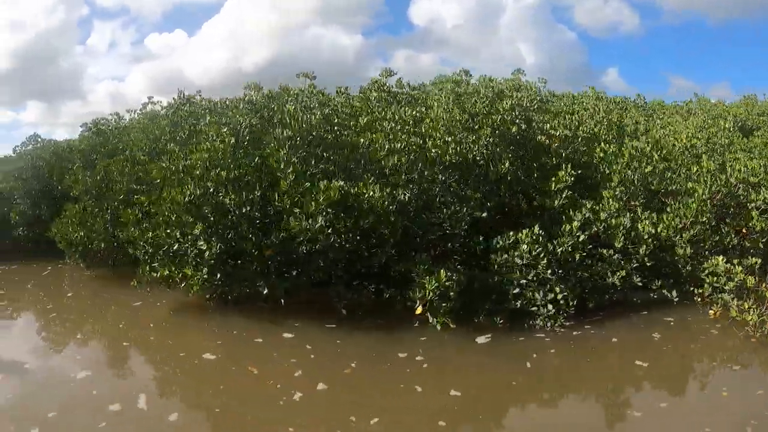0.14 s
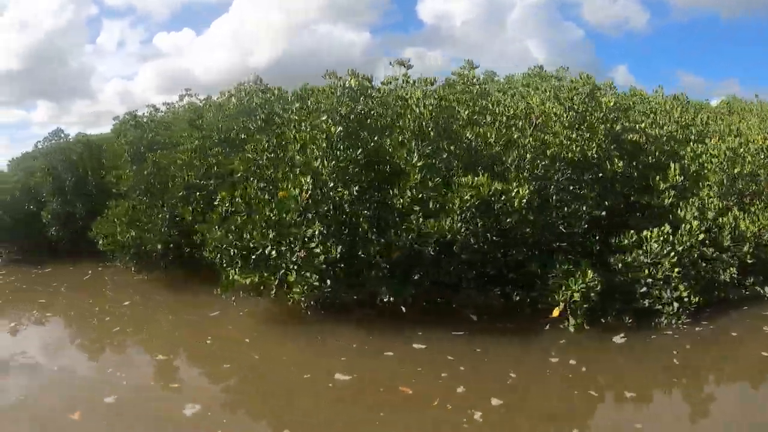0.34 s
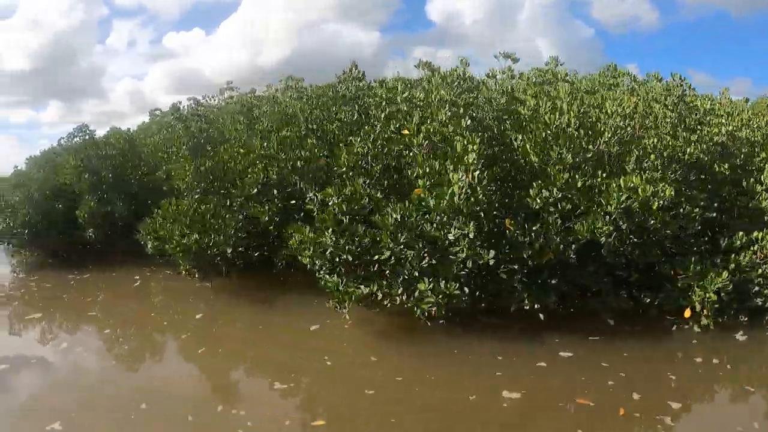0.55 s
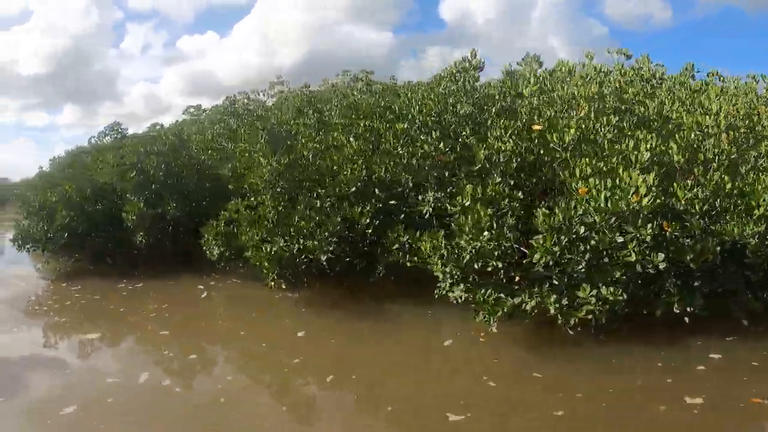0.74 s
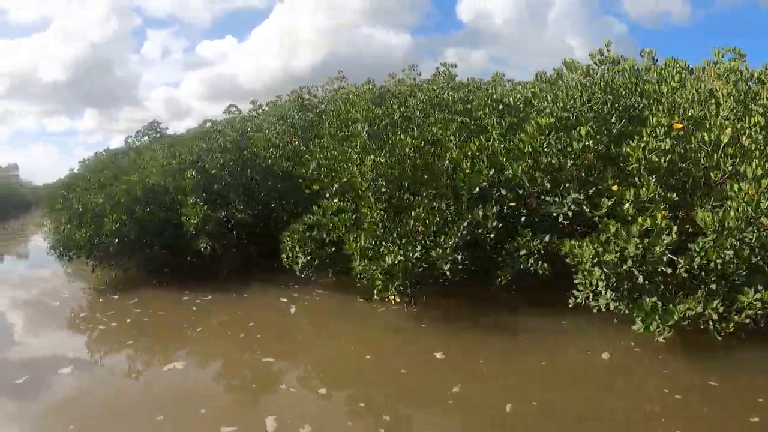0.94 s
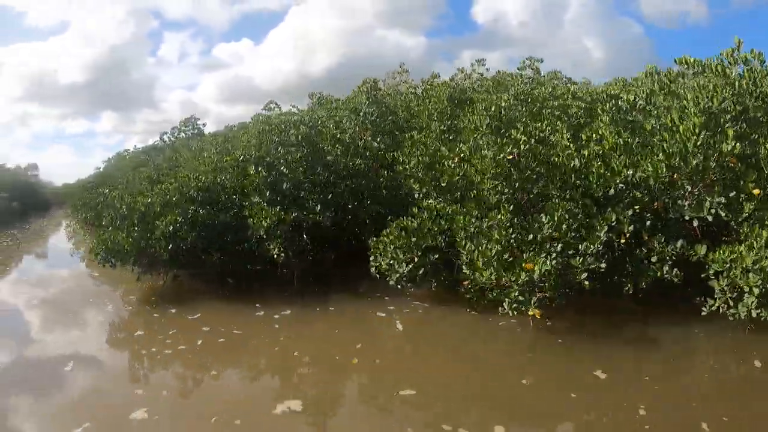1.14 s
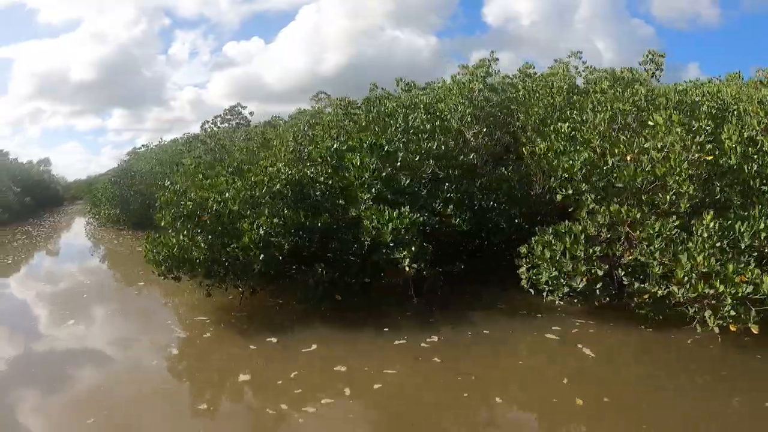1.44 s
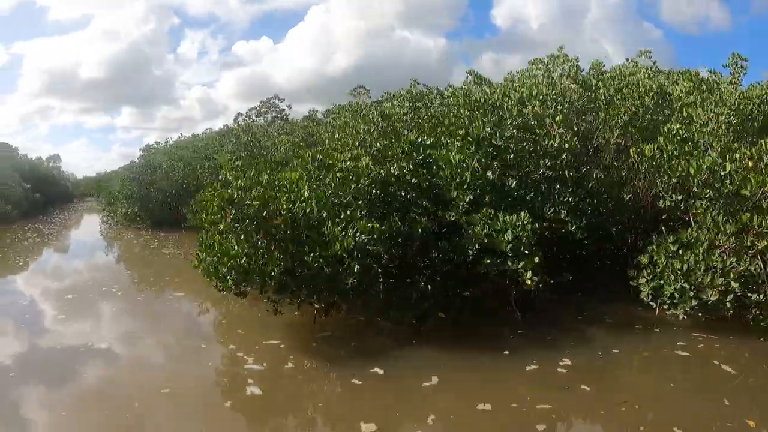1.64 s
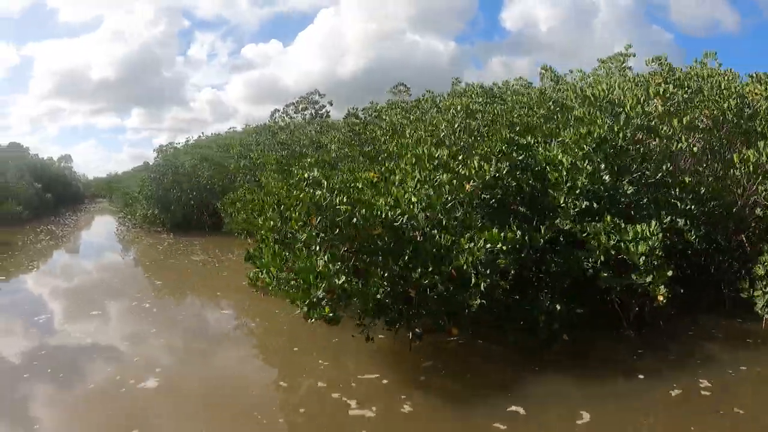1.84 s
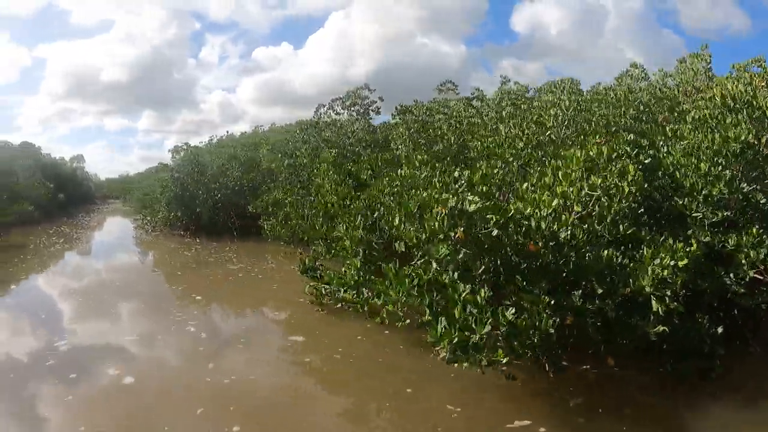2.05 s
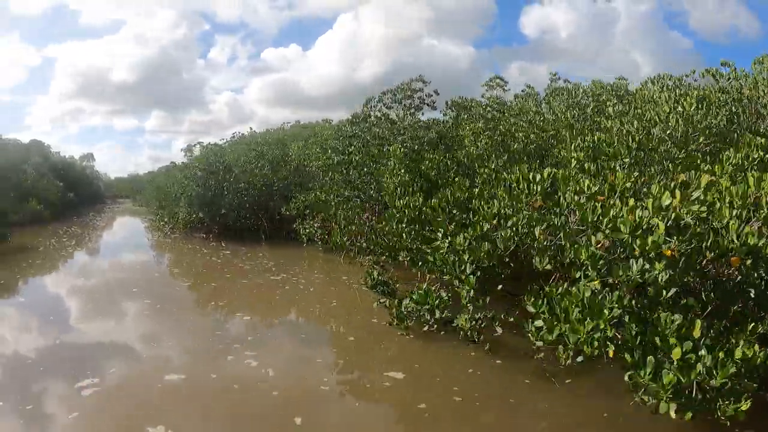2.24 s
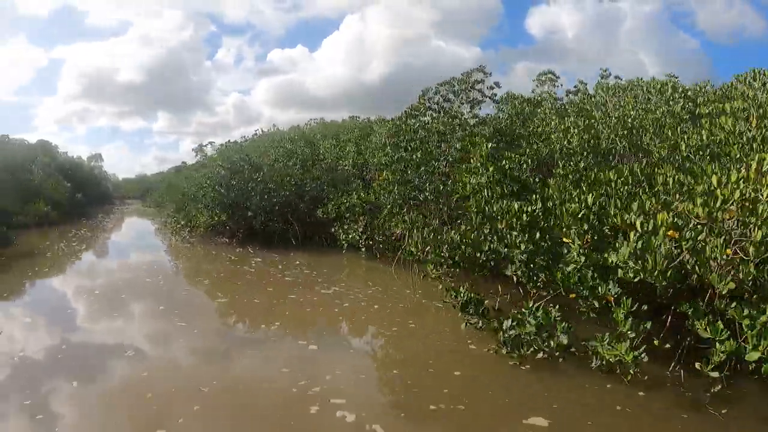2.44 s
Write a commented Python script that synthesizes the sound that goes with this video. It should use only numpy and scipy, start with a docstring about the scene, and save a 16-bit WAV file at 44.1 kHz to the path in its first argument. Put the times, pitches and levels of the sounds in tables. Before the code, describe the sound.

An outboard motor drones at a steady cruising speed, low and buzzy with a rough rasp, while wake rushes and fizzes along the hull, swelling midway; light wind rumbles the on-board microphone on an open river.

```python
"""An outboard motor drones at a near-steady speed, heard on board by a listener slowly turning to the bow.
Phase-locked harmonics of the engine cycle make the firing note and buzz; gated noise makes the rasp.
The wake rushes and fizzes along the hull, swelling midway: flickering noise, ringing bubbles, fine spray.
A hollow wash comes up midway, over a lumpy low rumble of wind made of noise with short buffets."""
import sys
import numpy as np
from scipy import signal
from scipy.fft import rfft, irfft, next_fast_len
from scipy.io import wavfile

SR = 44100
rng = np.random.default_rng(int(sys.argv[2]) if len(sys.argv) > 2 else 0)


def digitize_waveform(pressure):
    """Quantize a signal to 16-bit integers and store it at the path in sys.argv[1].

    Rows of a 2-D input are taken as channels; values are limited to [-1, 1].
    """
    field = np.atleast_2d(pressure).T
    bounded = np.clip(field, -1, 1)
    quanta = np.round(bounded * 32767).astype(np.int16)
    wavfile.write(sys.argv[1], SR, quanta)


N = 114660


def from_db(db):
    """Decibels to amplitude gain."""
    return 10 ** (np.asarray(db) / 20)


def rms_one(x):
    """Scale to unit rms."""
    return x / np.sqrt(np.mean(x ** 2) + 1e-20)


def in_time(rows):
    """Interpolate (seconds, value) rows to every sample."""
    seconds, values = np.transpose(rows)
    return np.interp(np.arange(N) / SR, seconds, values)


def drift(corner_hz):
    """Random wandering, rms 1: white noise through two equal low-pass poles."""
    step = 40  # samples per control point
    pole = np.exp(-2 * np.pi * corner_hz * step / SR)
    noise = rng.standard_normal(N // step + 2002)
    slow = signal.lfilter([1], [1, -2 * pole, pole * pole], noise)[2000:]  # drop the settling
    slow = rms_one(slow - slow.mean())
    return np.interp(np.arange(N) / step, np.arange(len(slow)), slow)


def banded_noise(spectrum, patchy_db, flicker_hz):
    """Noise of a smooth spectrum whose overlapping half-octave bands flicker independently; rms 1."""
    hz, db = np.transpose(spectrum)
    size = next_fast_len(N)
    octave = np.log2(np.maximum(np.arange(size // 2 + 1) * SR / size, 1))
    inside = np.clip(octave, np.log2(hz[0]), np.log2(hz[-1]))
    outside_db = 30 * np.abs(octave - inside)  # 30 dB per octave beyond the table
    shape = from_db(np.interp(octave, np.log2(hz), db) - outside_db)
    coloured = rfft(rng.standard_normal(size)) * shape
    out = 0
    for centre in np.arange(4, 14.6, .5):  # log2 of Hz
        if hz[0] / 2 < 2 ** centre < hz[-1] * 2:
            share = np.maximum(1 - 2 * np.abs(octave - centre), 0)
            band = irfft(coloured * share, size)[:N]
            out = out + band * from_db(patchy_db * drift(flicker_hz))
    return rms_one(out)


# Wind rumble spectrum. Each row: frequency in Hz, relative density in dB per Hz.
WIND_SPECTRUM = [(15, 0.5), (25, -2.5), (40, -2), (62, -3), (95, -2), (140, -6), (220, -10.5), (500, -30),
                 (1500, -66)]
# Wind level before buffets. Each row: time in seconds, level in dB.
WIND_LEVEL_DB = [(0, -22), (.42, -23.5), (.8, -24.5), (1.35, -25.5), (1.8, -23.5), (2.2, -27.5), (2.6, -28)]
# Buffets of wind. Each row: centre in seconds, extra level in dB.
WIND_BUFFETS = [(.28, 2.5), (.44, 7), (1.33, 3), (1.599, 1), (2.21, 5.5)]
BUFFET_SIGMA_S = 0.032


def wind():
    """Low noise of the boat's own headwind, lifted by Gaussian buffets."""
    t = np.arange(N) / SR
    buffets_db = sum(db * np.exp(-.5 * ((t - s) / BUFFET_SIGMA_S) ** 2) for s, db in WIND_BUFFETS)
    rumble = banded_noise(WIND_SPECTRUM, patchy_db=0.5, flicker_hz=6)
    return from_db(in_time(WIND_LEVEL_DB) + buffets_db) * rumble


# Hollow band of hull noise. Each row: frequency in Hz, relative density in dB per Hz.
HOLLOW_SPECTRUM = [(480, -11), (550, -6), (585, -1.5), (640, -8), (720, -14.5)]
# Hollow band level. Each row: time in seconds, level in dB.
HOLLOW_LEVEL_DB = [(0, -49.5), (.7, -44.5), (1.05, -36), (1.45, -38), (1.8, -38.5), (2.6, -41)]


def hull():
    """Hollow wash: a narrow hump of noise that comes up midway."""
    return from_db(in_time(HOLLOW_LEVEL_DB)) * banded_noise(HOLLOW_SPECTRUM, patchy_db=1.0, flicker_hz=10)


BUBBLES_PER_S, BUBBLE_SPREAD_DB = 3600, 5
BUBBLE_CYCLES = 5  # cycles to decay 60 dB


def bubbles():
    """Dense tiny bubbles: random clicks strike 18 damped resonators; rms 1."""
    pitches_hz = np.geomspace(900, 5000, num=18)
    sizes = from_db(BUBBLE_SPREAD_DB * np.minimum(rng.exponential(1, N), 5))
    sizes = sizes * rng.choice([-1, 1], N)
    clicks = sizes * (rng.random(N) < BUBBLES_PER_S / SR)
    dealt = rng.integers(0, len(pitches_hz), N)
    out = 0
    for k, hz in enumerate(pitches_hz):
        r = np.exp(-np.log(1000) * hz / (BUBBLE_CYCLES * SR))
        w = 2 * np.pi * hz / SR
        struck = clicks * (dealt == k) + 1e-18
        out = out + signal.lfilter([0, np.sin(w)], [1, -2 * r * np.cos(w), r * r], struck)
    return rms_one(signal.sosfilt(signal.butter(2, 7000, fs=SR, output="sos"), out))


# Finest spray. Each row: frequency in Hz, relative density in dB per Hz.
SPRAY_SPECTRUM = [(8000, -11.5), (10000, -0.5), (12500, 0.5), (14500, -3), (16000, -10)]
# Spray level. Each row: time in seconds, level in dB.
SPRAY_LEVEL_DB = [(0, -91.5), (1.6, -84.5), (2.05, -76.5), (2.35, -66.5), (2.6, -66)]


def spray():
    """Trace of fine spray: faint high noise that grows late."""
    return from_db(in_time(SPRAY_LEVEL_DB)) * banded_noise(SPRAY_SPECTRUM, patchy_db=1.0, flicker_hz=25)


# Rush of the wake. Each row: frequency in Hz, relative density in dB per Hz.
WAKE_SPECTRUM = [(400, 2.5), (1000, 1.5), (1700, -2), (2600, -1.5), (4000, -2.5), (5000, -6), (6300, -11.5),
                 (8000, -15), (9500, -24), (11000, -34.5), (12300, -36), (15000, -52)]
# Level of the rush, before brightening. Each row: time in seconds, level in dB.
WAKE_LEVEL_DB = [(0, -41), (.35, -39.5), (.7, -38), (1.05, -37.5), (1.8, -37.5), (2.2, -39), (2.6, -40)]
BUBBLES_RE_RUSH_DB = -8
BRIGHTENING_DB_PER_DB = 0.45  # treble gain per dB of swell


def wake():
    """Rushing water plus bubbles, its treble rising faster than its level as it swells."""
    level_db = in_time(WAKE_LEVEL_DB)
    rush = banded_noise(WAKE_SPECTRUM, patchy_db=0.72, flicker_hz=9.3)
    water = rush + from_db(BUBBLES_RE_RUSH_DB) * bubbles()
    treble = signal.sosfilt(signal.butter(1, 3000, "high", fs=SR, output="sos"), water)
    treble_gain = from_db(BRIGHTENING_DB_PER_DB * (level_db - level_db.mean()))
    return from_db(level_db) * (water + treble * (treble_gain - 1))


# Mechanical rasp and hull rattle. Each row: frequency in Hz, relative density in dB per Hz.
RASP_SPECTRUM = [(130, -5.5), (200, -0.5), (280, -4.5), (390, -4.5), (480, -14.5), (600, -12.5),
                 (780, -18.5), (1000, -15.5), (1400, -25), (2000, -27.5), (4000, -39), (9000, -55)]
RASP_DB = -27.5  # before the swell
FIRING_DEPTH, LOPE_DEPTH = 0.12, 0.09


def rasp(angle, swell_db):
    """Engine and hull noise that pulses with each of three firings and lopes once a cycle."""
    gate = 1 + FIRING_DEPTH * np.cos(3 * angle) + LOPE_DEPTH * np.cos(angle)
    noise = banded_noise(RASP_SPECTRUM, patchy_db=1.2, flicker_hz=16)
    return from_db(RASP_DB + swell_db) * rms_one(gate * noise)


# Harmonics 2, 3 (firing), 4 and 6, changing as the listener turns, before flutter.
# Each row: time in seconds, rms level in dB.
SECOND_DB = [(0, -33.5), (.8, -27), (1.3, -31.5), (1.95, -36), (2.15, -45), (2.6, -45)]
FIRING_DB = [(0, -16), (.45, -18), (1.2, -15.5), (1.48, -17.3), (1.75, -15), (2.0, -16.5), (2.6, -16)]
FOURTH_DB = [(0, -25.5), (.4, -21), (.75, -21), (1.3, -26), (1.95, -25), (2.6, -25)]
SIXTH_DB = [(0, -32.5), (.5, -37), (.95, -41.5), (1.35, -29.5), (2.0, -26.5), (2.6, -26.5)]
# Weak low harmonics. Each row: multiple of the cycle rate, rms level in dB before flutter.
WEAK_ORDERS = [(1, -35), (5, -36)]
# Upper harmonics. Each row: multiple of the cycle rate, rms level in dB before swell and flutter.
BUZZ = [(7, -33), (8, -45), (9, -46), (11, -50.5), (13, -46.5), (14, -56), (15, -53), (16, -47), (17, -50),
        (19, -49.5), (24, -54.5), (25, -55), (26, -59.5)]
STRONG_FLUTTER_DB, FLUTTER_DB, FLUTTER_CORNER_HZ = 0.8, 0.5, 10.8


def harmonic(angle, k, db, flutter_db, phase=0):
    """Cosine locked to the k-th multiple of the cycle, its level fluttering."""
    level_db = db + flutter_db * drift(FLUTTER_CORNER_HZ)
    return np.sqrt(2) * from_db(level_db) * np.cos(k * angle + phase)


def exhaust(angle, swell_db):
    """Cycle harmonics: strong ones in phase, weak low ones opposed, buzz at random phases."""
    strong = 0
    for k, rows in ((3, FIRING_DB), (4, FOURTH_DB), (6, SIXTH_DB)):
        strong = strong + harmonic(angle, k, in_time(rows), STRONG_FLUTTER_DB)
    weak = harmonic(angle, 2, in_time(SECOND_DB), FLUTTER_DB)
    for k, db in WEAK_ORDERS:
        weak = weak + harmonic(angle, round(k), db, FLUTTER_DB)
    buzz = 0
    for k, db in BUZZ:
        phase = rng.uniform(0, 2 * np.pi)
        buzz = buzz + harmonic(angle, round(k), db + swell_db, FLUTTER_DB, phase)
    return strong - weak + buzz


# Engine speed before wobble. Each row: time in seconds, rate in cycles per second.
CYCLE_RATE_HZ = [(0, 56.22), (.45, 56.3), (1.05, 56.24), (1.25, 56.42), (1.5, 56.12), (1.9, 56.27),
                 (2.35, 56.06), (2.6, 56.22)]
WOBBLE_RMS_HZ, WOBBLE_CORNER_HZ = .12, 9
# Swell shared by rasp and buzz. Each row: time in seconds, gain in dB.
SWELL_DB = [(0, -0.5), (.5, -1), (1.0, 2), (1.45, 2.5), (1.8, 1.5), (2.2, 0), (2.6, -0.5)]


def motor():
    """Exhaust and rasp locked to one engine angle, the integral of a slightly wobbling speed."""
    cycles_per_s = in_time(CYCLE_RATE_HZ) + WOBBLE_RMS_HZ * drift(WOBBLE_CORNER_HZ)
    angle = 2 * np.pi * np.cumsum(cycles_per_s) / SR
    swell_db = in_time(SWELL_DB)
    return exhaust(angle, swell_db) + rasp(angle, swell_db)


def scene():
    """Wind, hull, wake, spray and motor in one channel."""
    return (wind() + hull() + wake() + spray() + motor())[None]


BASS_SPLIT_HZ, BASS_CEILING, BASS_KNEE = 820, 0.47, 5.2  # ceiling in full scale; higher knee is harder
CUTOFF_HZ = 16600


def record(dry):
    """Fast limiter on the bass envelope, then a steep cut of the top."""
    bass = signal.sosfiltfilt(signal.butter(2, BASS_SPLIT_HZ, fs=SR, output="sos"), dry)
    envelope = np.abs(signal.hilbert(bass))
    gain = (1 + (envelope / BASS_CEILING) ** BASS_KNEE) ** (-1 / BASS_KNEE)
    limited = dry + bass * (gain - 1)
    return signal.sosfilt(signal.cheby2(12, 70, CUTOFF_HZ, fs=SR, output="sos"), limited)


dry = scene()
out = record(dry)
digitize_waveform(out)
```